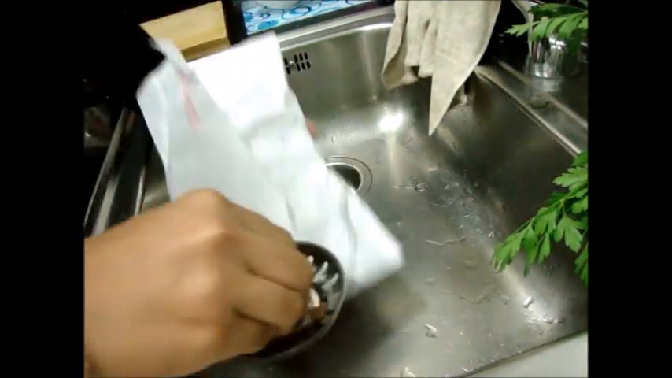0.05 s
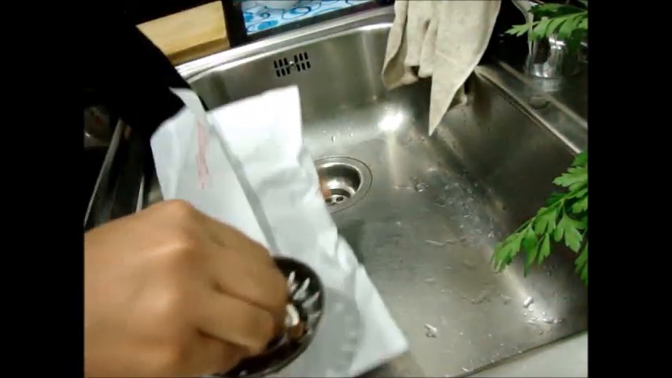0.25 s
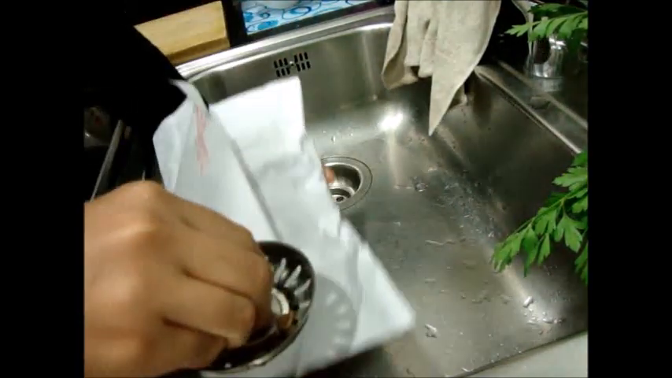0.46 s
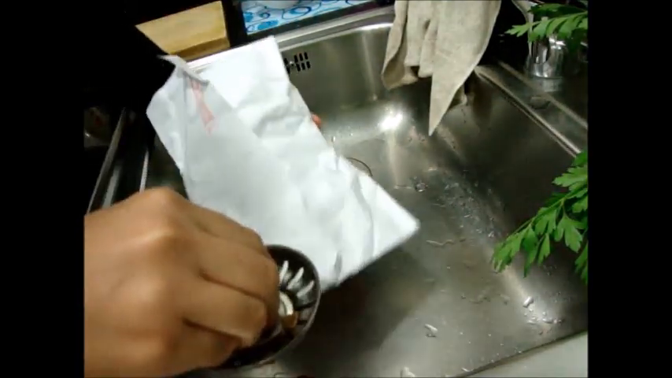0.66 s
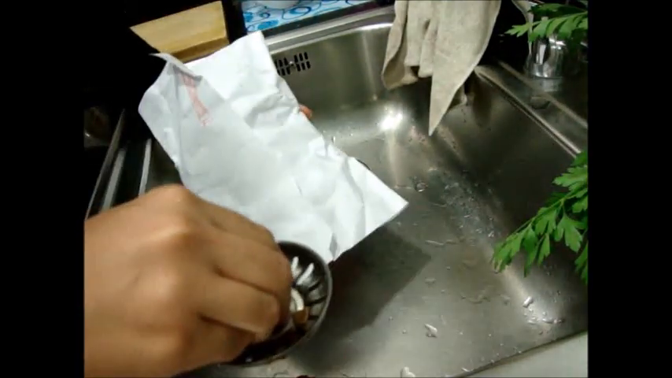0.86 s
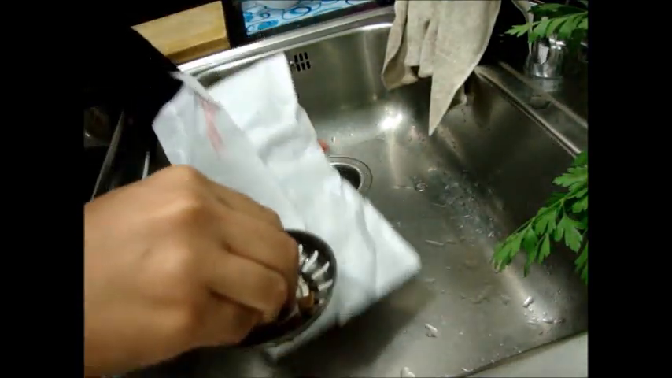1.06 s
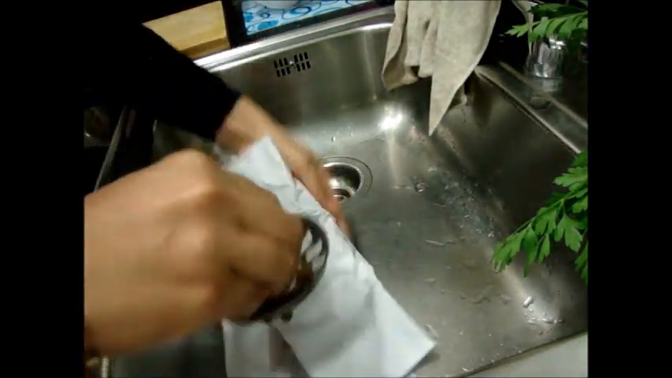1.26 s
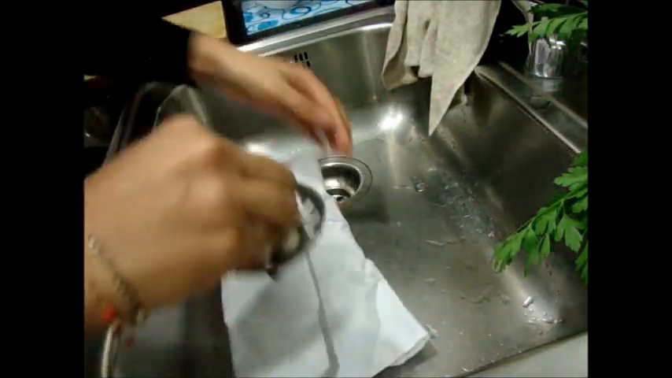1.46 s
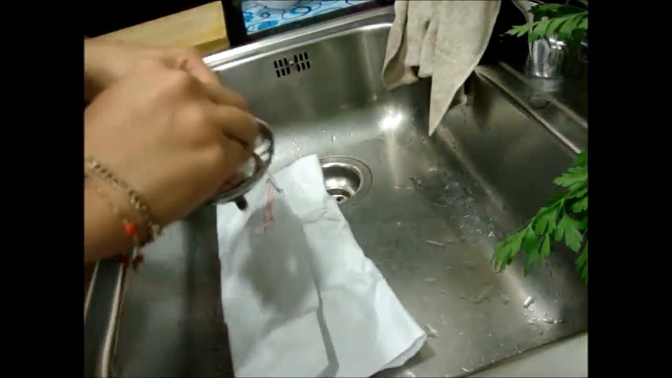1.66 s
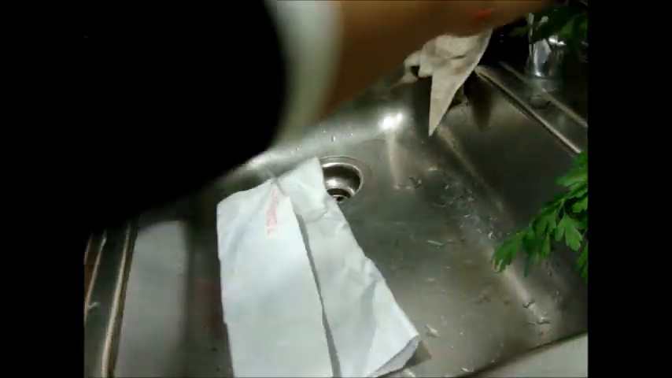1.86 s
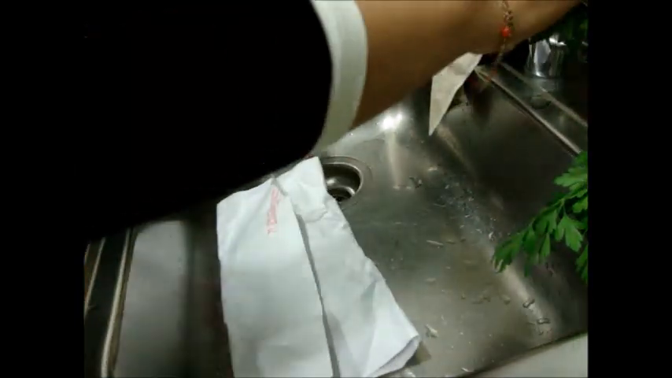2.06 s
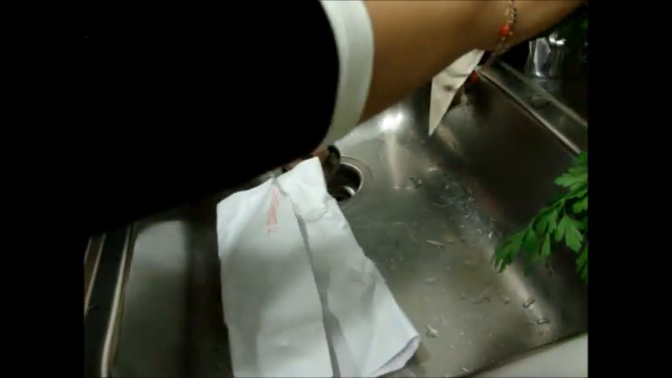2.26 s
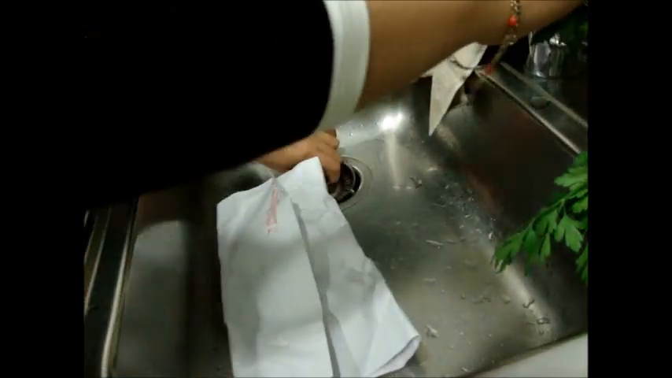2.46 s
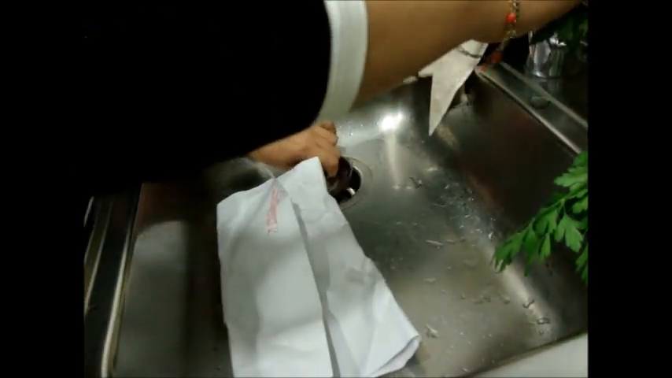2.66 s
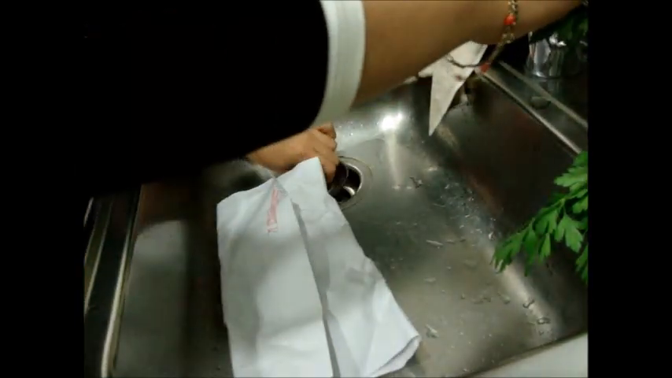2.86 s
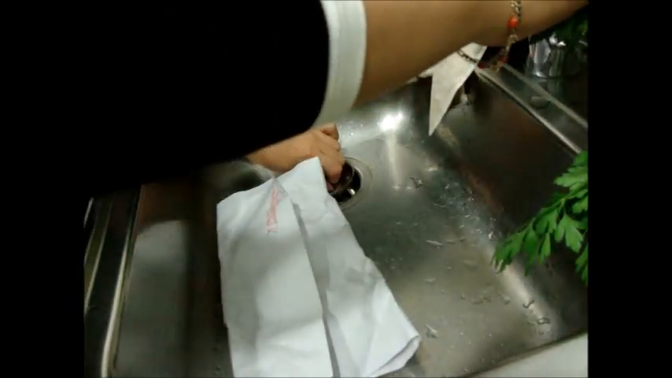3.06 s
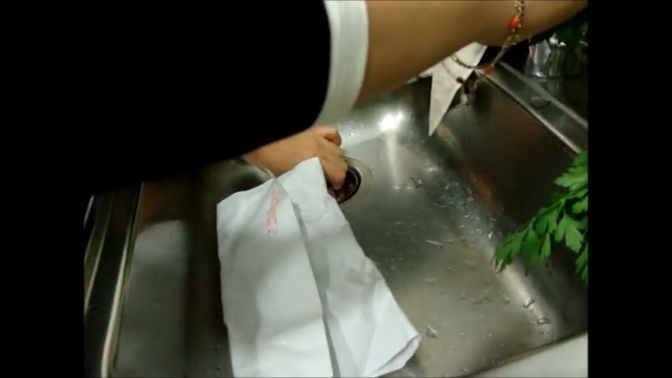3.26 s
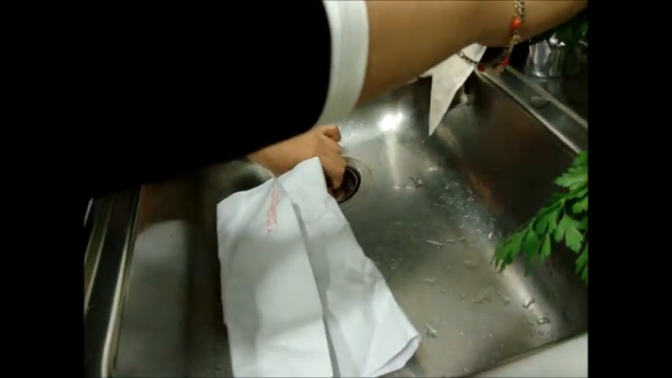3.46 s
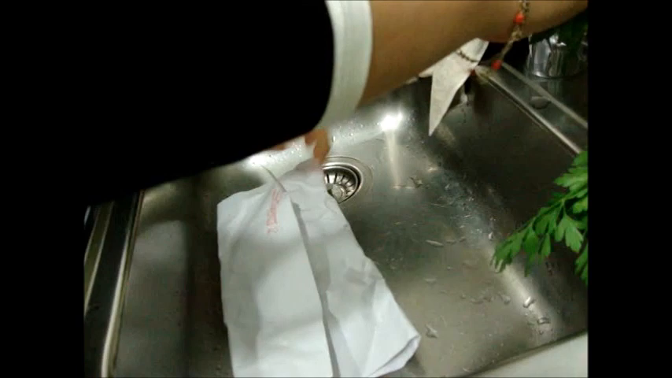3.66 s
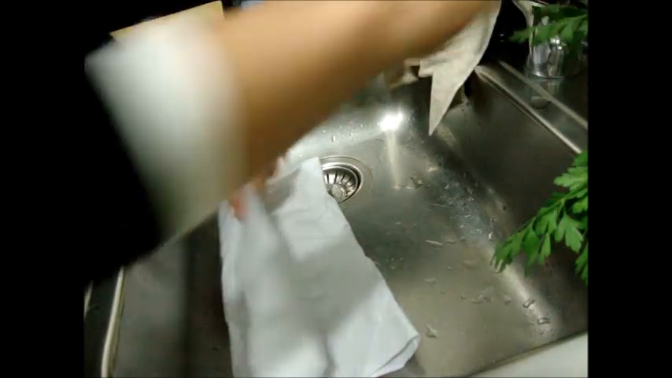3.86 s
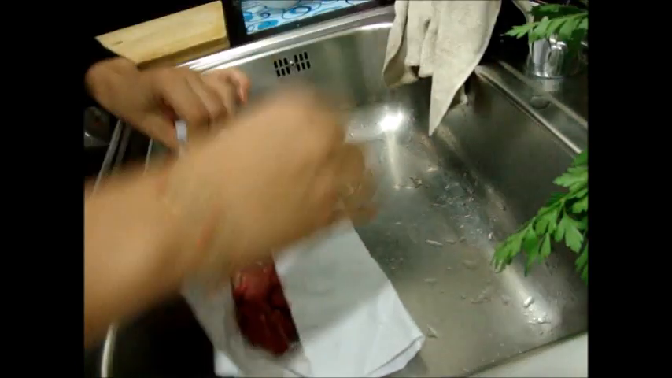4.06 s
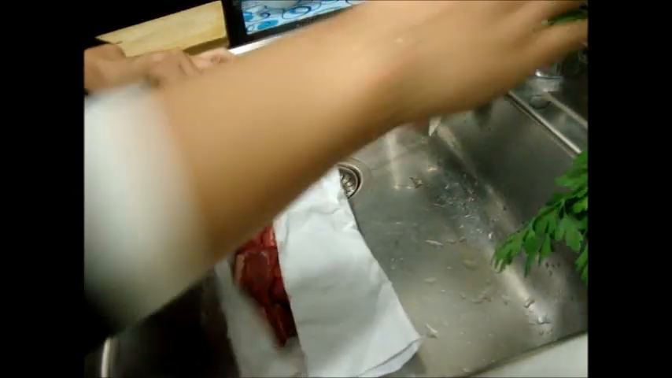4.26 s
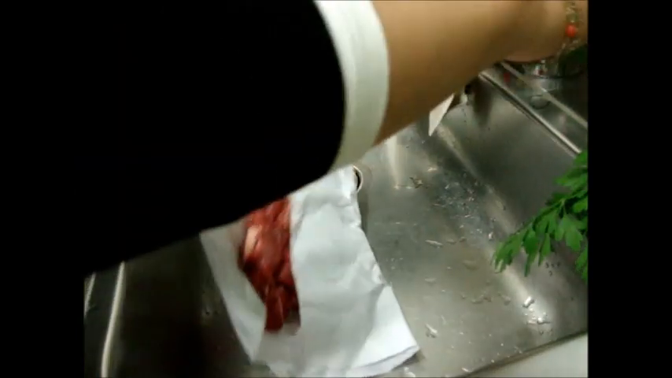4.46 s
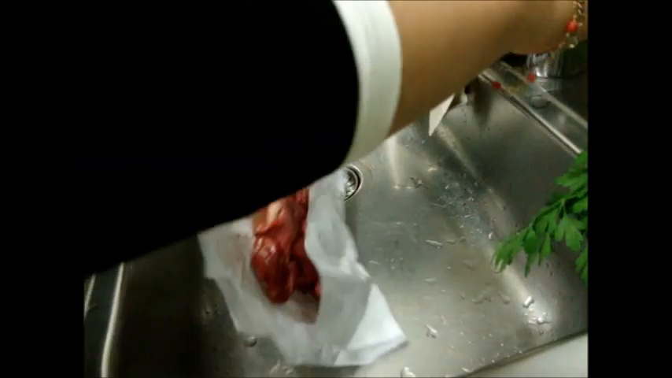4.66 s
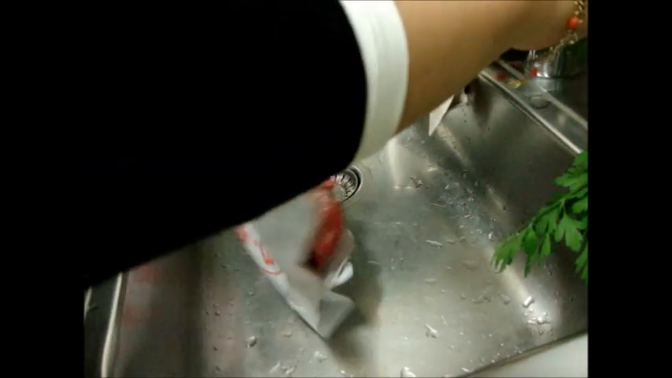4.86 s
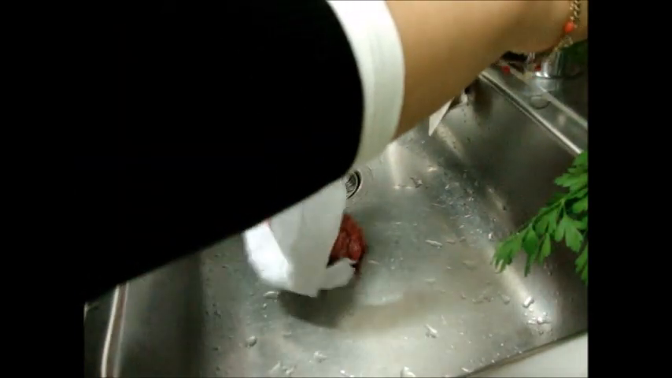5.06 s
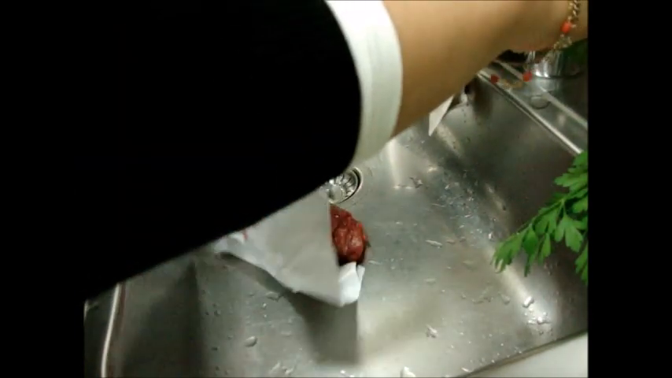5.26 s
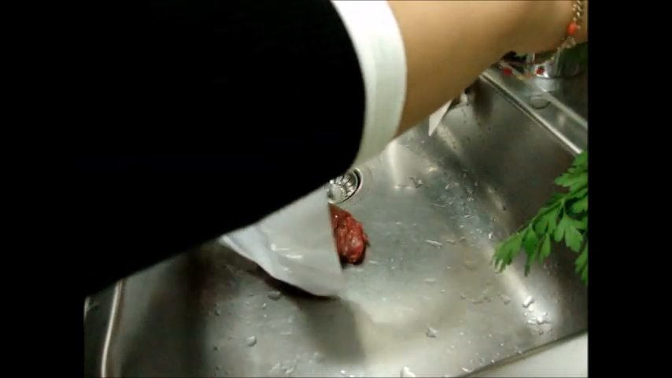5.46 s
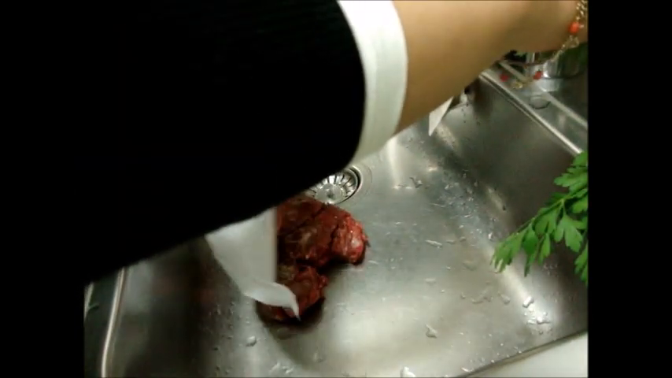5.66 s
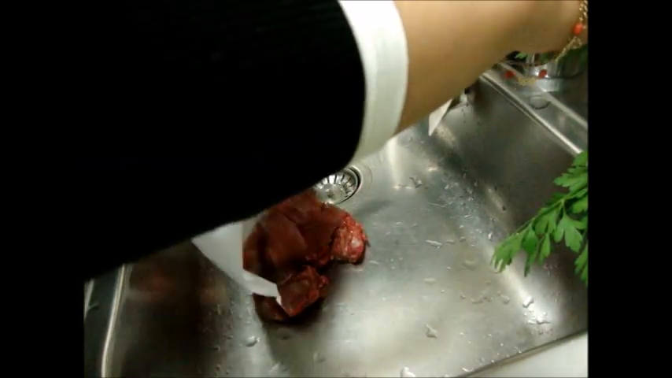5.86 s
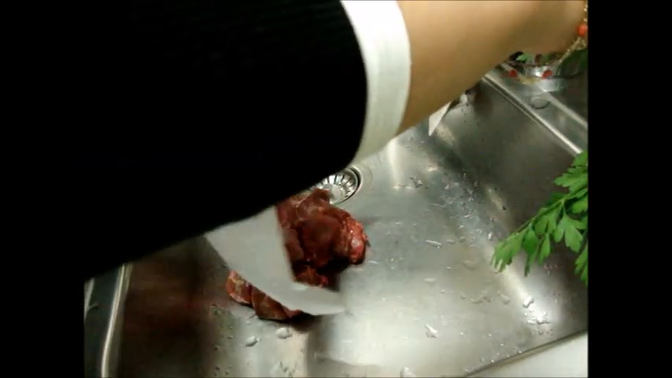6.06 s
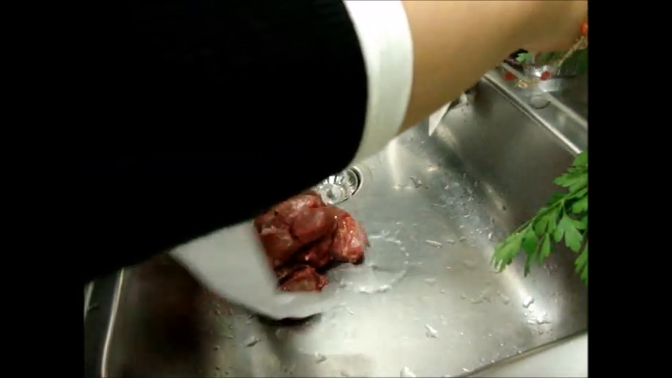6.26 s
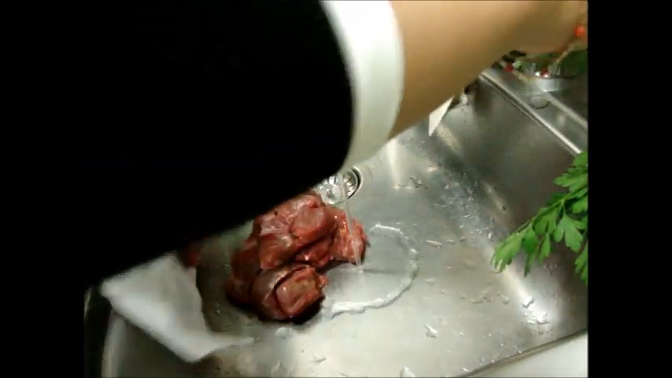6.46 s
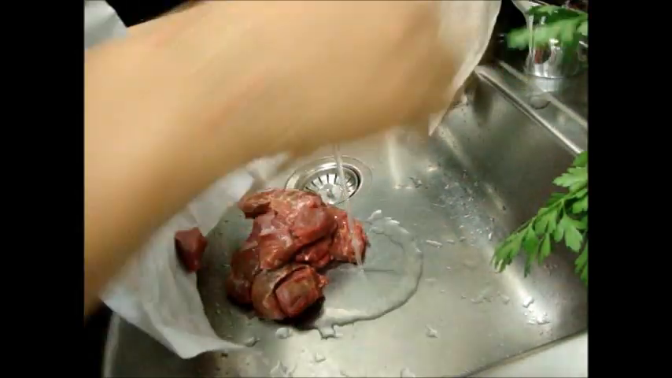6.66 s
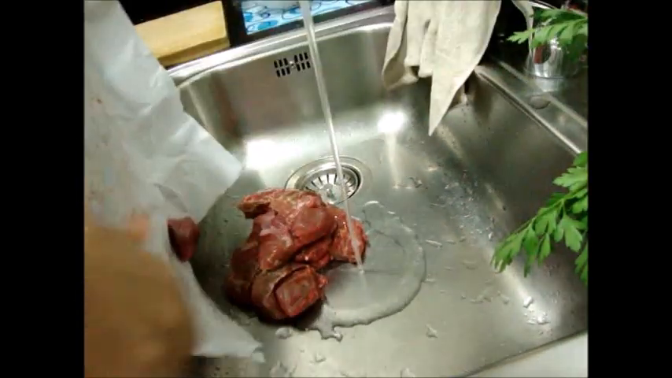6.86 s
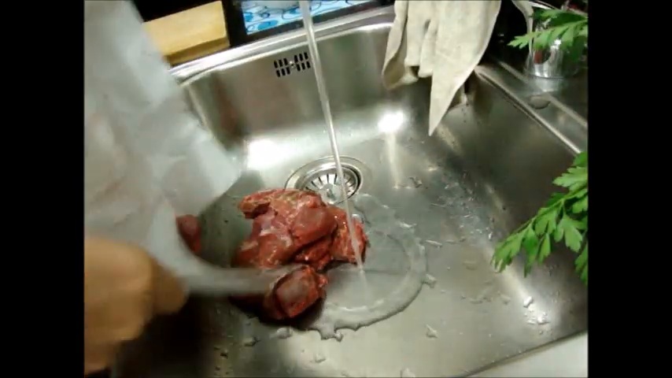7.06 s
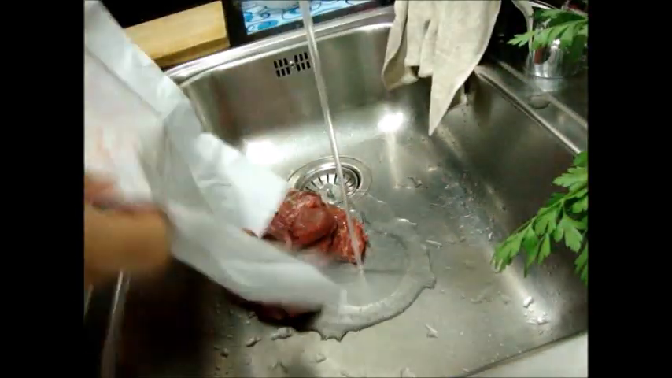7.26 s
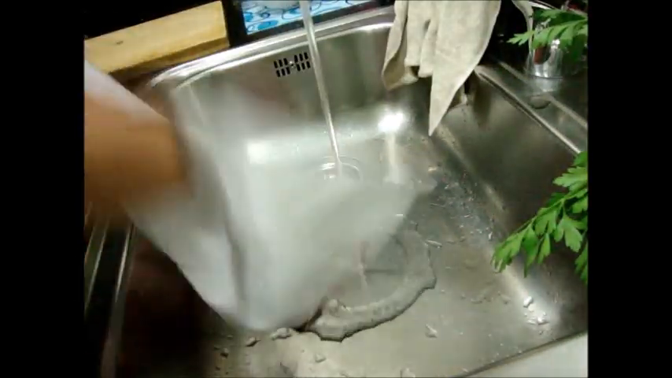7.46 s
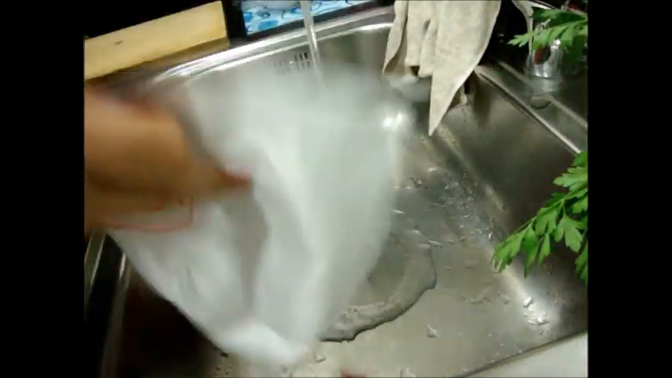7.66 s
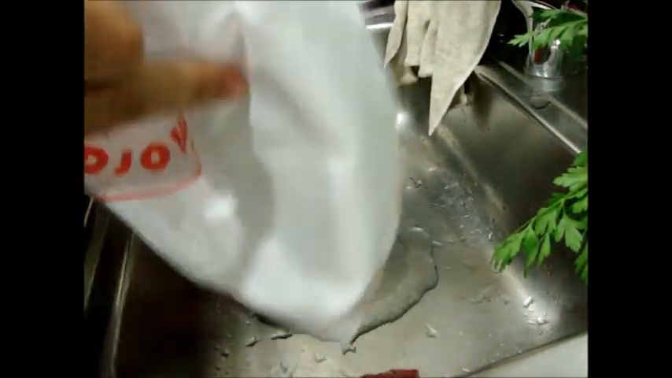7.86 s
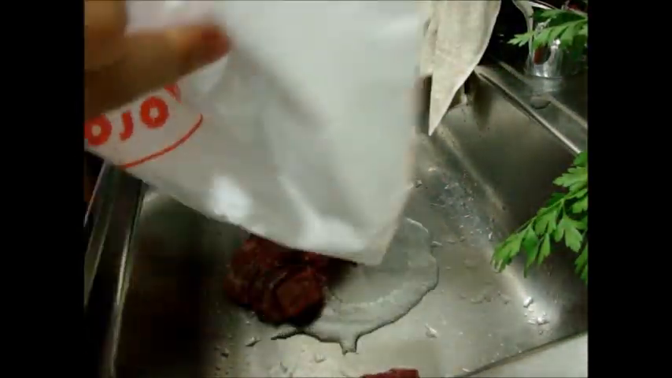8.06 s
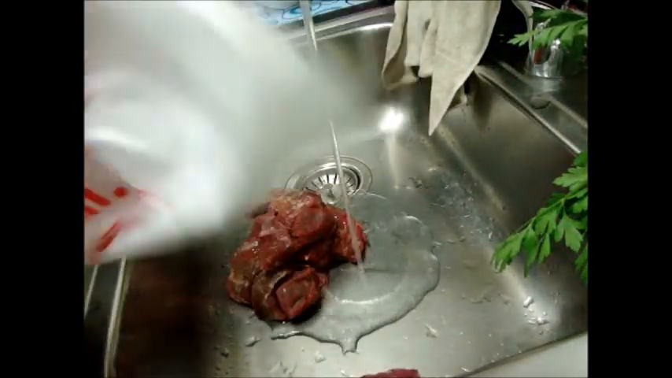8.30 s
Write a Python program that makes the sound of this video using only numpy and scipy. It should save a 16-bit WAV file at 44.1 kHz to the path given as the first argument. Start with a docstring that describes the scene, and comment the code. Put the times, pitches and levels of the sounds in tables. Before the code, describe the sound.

Paper rustles and snaps, a metal strainer clanks into a steel sink, meat thuds down, and a thin stream of tap water spatters.

```python
"""At a steel kitchen sink. First, wrapping paper is shaken and laid down, rustling and snapping.
From about 2 s a strainer is knocked into the drain, and both it and the basin ring.
Around 5 s meat tumbles out of the crunching paper and thuds on the steel. Near 6 s the tap opens,
and a thin stream hisses, spatters and drums on the basin while the paper crackles on."""
import sys
import numpy as np
from scipy import signal
from scipy.io import wavfile
from scipy.ndimage import uniform_filter1d

SR = 44100
rng = np.random.default_rng(int(sys.argv[2]) if len(sys.argv) > 2 else 0)


def store_wav(level_fs):
    """Save 16-bit WAV to argv[1]."""
    pcm = np.round(np.clip(np.atleast_2d(level_fs), -1, 1) * 32767)
    wavfile.write(sys.argv[1], SR, pcm.T.astype(np.int16))


N = 367353

# The notes the steel basin rings with, lowest first.
# Each row: pitch in Hz, relative level in dB, seconds to fade by 60 dB before damping.
BASIN_NOTES = [(115, -13.5, 0.26), (153.6, -4, 0.29), (234.3, -4, 0.18), (300.6, -10, 0.54),
               (418.6, 12.5, 0.36), (476, -0.5, 0.3), (507, -7, 0.3), (559, 0, 0.4), (652, -2, 0.23),
               (716, 8.5, 0.11), (802, -14, 0.94), (858, 9, 0.21), (936, -8.5, 0.2), (998, 3.5, 0.39),
               (1190, -2, 0.25), (1350, -21, .16)]


def gain_of(db):
    """Turns decibels into a number to multiply by."""
    return 10 ** (np.asarray(db) / 20)


def evened(x):
    """Scales a sound to an average strength (rms) of 1."""
    return x / np.sqrt(np.mean(x ** 2) + 1e-20)


def follow(rows):
    """Joins rows of a time and levels in dB into one gain curve per level, silent outside them."""
    times, *levels = np.transpose(rows)
    return [gain_of(np.interp(np.arange(N) / SR, times, db, -120, -120)) for db in levels]


def add(mix, start, sound):
    """Mixes a sound in at a start time in seconds."""
    part = mix[round(start * SR):][:len(sound)]
    part += sound[:len(part)]


def band(x, lo_hz, hi_hz):
    """Keeps the part of a sound between two pitches, at strength 1."""
    return evened(signal.sosfilt(signal.butter(3, [lo_hz, hi_hz], "bandpass", fs=SR, output="sos"), x))


def wobble(seconds):
    """A random curve that changes over about this much time."""
    return evened(uniform_filter1d(rng.standard_normal(N), int(seconds * SR)))


def hiss(spectrum, patchy_db, size=512):
    """Noise with a given balance of low and high, and drifting louder and softer patches."""
    frames, hz = 4 * N // size + 5, np.fft.rfftfreq(size, 1 / SR)
    real, imag, patches = rng.standard_normal((frames, len(hz), 3)).T
    patches = evened(uniform_filter1d(uniform_filter1d(patches, size=5, axis=0), size=6, axis=1))
    points_hz, points_db = np.transpose(spectrum)
    db = np.interp(np.log(hz + 1), np.log(points_hz + 1), points_db)
    shaped = (real + 1j * imag) * gain_of(db[:, None] + patchy_db * patches)
    return evened(signal.istft(shaped, nperseg=size, noverlap=3 * size // 4)[1][:N])


def clicks(per_s, spread_db):
    """Clicks of uneven size at random moments."""
    return gain_of(spread_db * np.minimum(rng.exponential(1, N), 4)) * (rng.random(N) < per_s / SR)


def crackle(per_s, spread_db, grain_s):
    """Noise chopped into many short grains."""
    decay = np.exp(-1 / (grain_s * SR))
    return evened(signal.lfilter([1], [1, -decay], clicks(per_s, spread_db)) * rng.standard_normal(N))


def resonate(x, hz, width_hz):
    """Narrows noise to a breathy note whose pitch may move."""
    turn = np.exp(2j * np.pi * np.cumsum(hz * np.ones(len(x))) / SR)
    return evened((turn * signal.lfilter([1], [1, -np.exp(-np.pi * width_hz / SR)], x / turn)).real)


def ring(notes, centre_hz, damping, reach_db, rise_s=0.00012):
    """One blow on pressed steel, which splits each note into two close pitches that waver together."""
    hz, db, fade_s = np.transpose(notes)[:, :, None]
    t = np.arange(SR // 2) / SR
    # Where the blow lands favours notes near centre_hz; the rest lose at most reach_db.
    db = db - np.minimum(16 * np.log2(hz / centre_hz) ** 2, reach_db)
    split, phase, twin_phase = rng.random((len(hz), 3, 1)).transpose(1, 0, 2)
    tone = np.sin(2 * np.pi * (hz * t + phase))
    twin = np.sin(2 * np.pi * (hz * (1.003 + 0.008 * split) * t + twin_phase))
    sound = (gain_of(db - 60 * t * damping / fade_s) * (tone + 0.4 * twin)).sum(0)
    return sound * (1 - np.exp(-t / rise_s)) / np.linalg.norm(gain_of(db))


def rattled(sound, fade_s, bounce_db):
    """A quick run of small bounces after a blow roughens its ring."""
    t = np.arange(int(.08 * SR)) / SR
    bounces = rng.standard_normal(len(t)) * (rng.random(len(t)) < 900 / SR)
    bounces *= gain_of(bounce_db - 60 * t / fade_s)
    bounces[0] = 1
    return signal.fftconvolve(sound, bounces / np.linalg.norm(bounces))


def burst(level_db, hz, body_db, edge_db, fade_s, crack_s, tail_db):
    """A short crack around a hollow pitch, then echoes in the basin that last longer in the bass."""
    t = np.arange(int(.3 * SR)) / SR
    noise, out = rng.standard_normal(len(t)), np.zeros(len(t))
    layers = [(body_db, 230, 750, 1.3, .0025), (level_db, 0.65 * hz, 1.42 * hz, 1.1, .0005),
              (level_db - 4, 900, 3500, .9, .0005),
              (edge_db, 3500, 7000, .8, .0004), (edge_db - 7.5, 6500, 10000, .75, .0003)]
    for db, lo_hz, hi_hz, stretch, rise_s in layers:
        fade = np.exp(-t / crack_s) + gain_of(tail_db - 60 * t / (stretch * fade_s))
        out += gain_of(db) * band(noise, lo_hz, hi_hz) * (1 - np.exp(-t / rise_s)) * fade
    return out


def kitchen_air():
    """The quiet, steady hiss of the room."""
    # The tone of the room. Each row: frequency in Hz, relative level in dB.
    spectrum = [(18, -12), (30, -33.5), (149, -6), (358, -11), (414, -4.5), (456, -7.5), (880, -7),
                (1180, -10.5), (4710, -16), (10000, -21.5), (13000, -71), (22000, -120)]
    return gain_of(-53.5) * hiss(spectrum, patchy_db=1.8, size=1024)


def puffs():
    """Air moved by the flapping paper pushes on the microphone."""
    # Puffs of air. Each row: start in seconds, level in dB.
    gusts = [(0.17, -49), (0.399, -56), (1.288, -36), (2.869, -76), (5.049, -37), (5.899, -56),
             (6.749, -45), (7.519, -44)]
    out, progress = np.zeros(N), np.linspace(0, 1, int(0.032 * SR))
    for start, db in gusts:
        add(out, start, gain_of(db) * np.sin(2 * np.pi * 2.6 * progress) * np.sin(np.pi * progress) ** 2)
    return out


def thuds():
    """Soft blows wake only the basin's low notes, damped by what lies on the steel."""
    # Hands, meat and surges of water. Each row: start in seconds, level in dB, favoured pitch in Hz.
    blows = [(0.163, -28, 310), (1.292, -25.5, 158), (1.338, -28, 306), (2.439, -17.5, 197),
             (2.867, -42, 153), (3.186, -24.5, 182), (5.045, -19.5, 113.2), (5.072, -15.5, 232),
             (6.196, -21, 204), (6.28, -33, 300), (6.34, -23, 225), (6.642, -28.5, 288)]
    out = np.zeros(N)
    for start, db, hz in blows:
        add(out, start, gain_of(db) * ring(BASIN_NOTES[:4], hz, damping=2.2, reach_db=11, rise_s=0.0042))
    return out


def flap():
    """A fold of paper swings down, and its hollow note falls as it opens."""
    # The swing. Each row: time in seconds, level in dB, pitch in Hz.
    swing = [(0.1, -44, 1990), (0.13, -51, 1470), (0.15, -44, 1020), (0.171, -30.5, 740), (0.195, -42, 664),
             (0.21, -62, 660)]
    times, _, hz = np.transpose(swing)
    pitch = np.interp(np.arange(N) / SR, times, hz)
    loudness, = follow([row[:2] for row in swing])
    return loudness * resonate(rng.standard_normal(N), pitch, width_hz=76)


def pops():
    """A crease flips or the strainer strikes: a tone a few waves long, with a fainter, higher one."""
    # Hard pops. Each row: start in seconds, level in dB, pitch in Hz.
    hits = [(1.215, -18.5, 890), (1.283, -17, 1440), (1.447, -25, 665), (2.165, -23, 1050),
            (2.429, -9, 2500), (2.427, -11.5, 1250), (2.475, -25, 1790), (2.701, -24, 1910),
            (2.863, -9.5, 860), (3.27, -26.5, 510), (3.881, -18, 1160), (4.846, -20, 1480),
            (4.904, -25, 1050), (4.927, -27.5, 480), (4.964, -23, 1090), (4.995, -10.5, 1310),
            (5.054, -17, 1200), (5.125, -8.5, 1640), (5.229, -20.5, 564), (5.327, -25, 523),
            (5.433, -22.5, 2700), (6.951, -25.5, 530), (7.013, -20.5, 890), (7.044, -24, 860),
            (7.279, -19.5, 593), (7.495, -49, 585), (7.668, -22, 950)]
    out = np.zeros(N)
    for start, db, hz in hits:
        phase, high_phase = rng.random(2)
        cycles = np.arange(SR // 100) / SR * hz
        tone = np.sin(2 * np.pi * (cycles + phase))
        tone += gain_of(-19.5) * np.sin(2 * np.pi * (2.53 * cycles + high_phase))
        age = cycles / 1.08  # loudest at age 1
        add(out, start, gain_of(db) * tone * (age * np.exp(1 - age)) ** 2)
    return out


def tap():
    """Air and water rush through the spout and hiss at the valve as the tap opens."""
    # The tap opening. Each row: time in seconds, spout level in dB, valve level in dB.
    opening = [(5.82, -83, -76), (5.9, -51, -61), (5.964, -46, -60), (6.076, -61, -54), (6.176, -59, -56),
               (6.3, -75, -55), (6.6, -75, -47.5)]
    # The notes of the spout and of the valve. Each row: pitch in Hz, width in Hz, relative level in dB.
    spout = [(660, 60, -6), (940, 69, -5)]
    valve = [(3400, 230, -1), (4090, 120, -7), (5550, 300, -9.5)]
    noise, out = rng.standard_normal(N), np.zeros(N)
    for loudness, notes in zip(follow(opening), (spout, valve)):
        out += loudness * evened(sum(gain_of(db) * resonate(noise, hz, width) for hz, width, db in notes))
    return out


def spatters(pitches=14, cycles=9.3):
    """Separate drops, each a tiny note that rises as its bubble closes."""
    sizes = clicks(per_s=100, spread_db=2.7)
    kind, out = rng.integers(0, pitches, N), np.zeros(N)
    for k, hz in enumerate(np.geomspace(4390, 7800, pitches)):
        age = np.arange(SR // 100) / SR * hz / cycles
        drop = np.sin(2 * np.pi * cycles * age * (0.952 + 0.041 * age)) * age * np.exp(-2.5 * age)
        out += signal.oaconvolve(sizes * (kind == k), drop)[:N]
    return evened(out)


def water():
    """The stream splats on dry steel, then hisses, drums on the basin and spatters in spurts."""
    # The stream on the steel. Each row: time in seconds, then hiss, drumming and spatter levels in dB.
    stream = [(6.195, -51, -45, -62), (6.26, -47, -42.5, -51), (6.37, -41.5, -41.5, -51),
              (6.5, -42, -43, -65), (6.63, -46.5, -46, -40), (6.75, -43.5, -37, -49),
              (6.88, -38.5, -42.5, -40), (7.04, -39.5, -48, -54), (7.24, -46.5, -47.5, -49),
              (7.5, -40.5, -44.5, -47), (7.77, -39, -45, -43.5), (7.92, -39, -41, -47),
              (8.1, -40, -45, -45.5), (8.33, -37, -45, -44.5)]
    # The tone of the spray. Each row: frequency in Hz, relative level in dB.
    spectrum = [(290, -30), (500, -1.5), (619, 6.5), (827, -12), (1050, 3.5), (1800, -6), (2320, 0),
                (3020, -5), (4080, 0), (6000, -13.5), (8050, -8), (9600, -5), (10100, -8), (13100, -66),
                (22000, -120)]
    hiss_gain, drum_gain, spatter_gain = follow(stream)
    spurts = gain_of(4.5 * wobble(0.051))
    drops = crackle(per_s=420, spread_db=4, grain_s=.0018)
    sputter = 0.6 * band(drops, 4470, 6800) + spatters() + 0.078 * band(drops, 630, 5400)
    beats = crackle(per_s=600, spread_db=2.5, grain_s=.002)
    low_ring = ring(BASIN_NOTES[:4], centre_hz=152, damping=2.7, reach_db=2)
    drum = 0.98 * evened(signal.oaconvolve(beats, low_ring)[:N])
    drum += 0.42 * band(beats, 170, 328) + 0.37 * band(beats, 38, 100) + 0.36 * band(beats, 460, 930)
    spray = gain_of(1.5 * wobble(0.018)) * hiss(spectrum, patchy_db=4)  # flickers quickly in loudness
    mist = gain_of(-15.5) * band(crackle(per_s=1200, spread_db=2, grain_s=.003), 9200, 10640)
    droplets = gain_of(-5.5) * band(crackle(per_s=71, spread_db=3.5, grain_s=.0038), 4730, 6150)
    out = hiss_gain * (spray + mist) + drum_gain * drum + spatter_gain * spurts * (sputter + droplets)
    splat = burst(-30.5, hz=734, body_db=-30.5, edge_db=-50.5, fade_s=0.81, crack_s=0.0059, tail_db=-6.5)
    add(out, stream[0][0], splat)
    return out


def spray_ticks():
    """Short bright ticks in the spray, each a ping with a faint splashy tail."""
    # The ticks. Each row: start in seconds, level in dB, pitch in Hz.
    ticks = [(6.349, -30, 6000), (6.374, -28, 7500), (6.553, -21.5, 4400), (6.647, -29.5, 5100),
             (6.6732, -26, 5530), (6.7098, -18.5, 7640), (6.728, -24, 4600), (6.7428, -5, 4110),
             (6.775, -15.5, 4980), (6.8106, -32, 4850), (6.847, -18, 6060), (6.8726, -24, 5460),
             (7.218, -8, 5930), (7.261, -18.5, 5460), (7.29, -13.5, 6000), (7.3527, -17, 6100),
             (7.426, -12, 5900), (7.446, -20, 5910), (7.5203, -21, 5470), (7.5437, -13.5, 4040),
             (7.583, -17.5, 5800), (7.6542, -8, 6300), (7.7144, -23, 6350), (7.7413, -23, 5500),
             (7.8401, -23, 4470), (7.894, -18, 5440), (7.989, -17.5, 3750), (8.0003, -16, 5370),
             (8.0344, -18, 4050), (8.082, -43, 5730), (8.094, -15.5, 5430), (8.121, -14.5, 5720),
             (8.275, -26, 4260), (8.2973, -24, 7220)]
    t, out = np.arange(SR // 15) / SR, np.zeros(N)
    for start, db, hz in ticks:
        tone = np.sin(2 * np.pi * hz * (t + 0.00027 * np.tanh((t / 0.017) ** 2)))
        splash = band(rng.standard_normal(len(t)), 0.82 * hz, 1.26 * hz)
        tail = gain_of(-29.5 - 15.5 * np.log2(hz / 5500)) * np.exp(-t / 0.034)  # lower ticks ring more
        sound = (tone + 0.41 * splash) * np.exp(-t / 0.0012) + splash * tail
        add(out, start, gain_of(db) * sound * (1 - np.exp(-t / 0.00039)))
    return out


def strainer():
    """Each knock cracks, rattles and rings both strainer and basin; sliding rubs the strainer's notes."""
    # The strainer's own notes, with the same columns as BASIN_NOTES.
    notes = [(1200, -3, .13), (1520, -7, .08), (1680, -3, .12), (1850, -3, .12), (2260, -6, .1),
             (2600, -3, .16), (2850, -4, .14), (3300, -8, .07), (3800, -6, .07), (4100, -5, .06),
             (4600, -7, .06), (5050, -4, .08), (5500, -7, .06), (5900, -5, .07), (6350, -7, .06),
             (7800, -11, .05), (8300, -11, .05)]
    # Knocks on the drain or fingers. Each row: start in seconds, crack, basin and strainer levels in dB,
    # favoured pitch in Hz, bright edge in dB, how strongly the hand damps the basin.
    knocks = [(0.39, -51, -40.5, -47, 4020, -53, 2.3), (0.548, -43, -46, -35, 6600, -52, 1.3),
              (0.576, -32, -43, -60, 3850, -54, 2.1), (0.609, -36, -43.5, -42.5, 3800, -55, 1.16),
              (0.894, -32, -44, -41.5, 8300, -46, 2), (0.978, -25, -42, -33, 1680, -43.5, 1.8),
              (1.022, -36, -37.5, -33.5, 1610, -54, 2.5), (1.678, -39, -67, -44.5, 1600, -65, 1.5),
              (2.164, -17.5, -28, -27, 2640, -24.5, 2.1), (2.429, -3.5, -20.5, -15.5, 1920, -25, 2.6),
              (2.432, -30, -42, -26, 8000, -31, 3.3), (2.474, -7.5, -27.5, -18.5, 1780, -31, 1.6),
              (2.559, -43, -32.5, -56, 2410, -49, 3.1), (2.697, -22, -29.5, -26.5, 1910, -36, 2.9),
              (2.862, -3, -4, -9, 5570, -18, 1.1), (2.961, -16, -18.5, -24.5, 2180, -45, 1.46),
              (3.053, -44, -29, -37, 2270, -59, 0.92), (3.19, -25, -34.5, -35, 1710, -45, 1.14),
              (3.27, -20.5, -25, -35, 1805, -58, 1.7)]
    # Slides on the steel. Each row: start and length in seconds, top level in dB, favoured pitch in Hz.
    scrapes = [(2.616, 0.12, -29.5, 1630), (3, 0.25, -44, 1950), (3.611, 0.053, -28.5, 3600)]
    t, out = np.arange(SR // 2) / SR, np.zeros(N)
    for start, crack_db, basin_db, cup_db, hz, edge_db, held in knocks:
        basin = gain_of(basin_db) * ring(BASIN_NOTES, 635, damping=held, reach_db=-1.5, rise_s=0.0027)
        cup = gain_of(cup_db) * ring(notes, hz, damping=1.6, reach_db=22)
        add(out, start, rattled(basin, fade_s=0.1, bounce_db=-24))
        add(out, start, rattled(cup, fade_s=0.12, bounce_db=-10))
        # Slots and loose parts blur into a jangle, the basin's many close notes into a clank.
        jangle = band(rng.standard_normal(len(t)), 0.74 * hz, min(1.036 * hz, 10000))
        add(out, start, gain_of(cup_db - 13 - 60 * t / 0.25) * jangle)
        clank = band(rng.standard_normal(len(t)), 510, 1064) * (1 - np.exp(-t / 0.0044))
        add(out, start, gain_of(basin_db - 11 - 60 * t * held / 0.41) * clank)
        add(out, start, burst(crack_db - 14, min(hz, 2500), basin_db - 4, edge_db,
                              fade_s=0.57, crack_s=0.0045, tail_db=-22))
    grit = crackle(per_s=1500, spread_db=1.5, grain_s=.002)
    for start, length, db, hz in scrapes:
        fastest = start + 0.45 * length
        loudness, = follow([(start, db - 18), (fastest, db), (start + length, db - 18)])
        rubbed = signal.oaconvolve(grit, ring(notes, hz, damping=3.1, reach_db=12))[:N]
        out += loudness * (0.34 * evened(rubbed) + 0.51 * band(grit, 330, 7000))
    return out


def paper():
    """Paper rustles under the hands, rumbles on the basin, snaps, and crunches as folds are crushed."""
    # One list per handling. Each row: time in seconds, rustle level in dB, higher crinkle level in dB.
    handlings = [
        [(0.0, -53, -49.5), (0.074, -49.5, -48.5), (0.178, -47, -71), (0.278, -59, -68), (0.508, -62, -62),
         (0.7, -59.5, -65)],
        [(0.86, -68, -78), (0.948, -54.5, -81), (1.068, -60.5, -57), (1.2, -46.5, -48), (1.235, -30.5, -38),
         (1.358, -32.5, -35.5), (1.5, -51.5, -44.5), (1.62, -72, -103)],
        [(3.79, -60, -63), (3.84, -40.5, -51), (3.9, -45, -62), (3.97, -45, -61), (4.04, -50, -61)],
        [(4.3, -79, -70), (4.502, -56.5, -50.5), (4.726, -48.5, -44.5), (4.95, -43, -45.5), (5.078, -34, -64),
         (5.22, -35.5, -53), (5.29, -50, -48), (5.388, -48, -52.5), (5.516, -41.5, -50.5), (5.62, -61, -65)],
        [(5.8, -78, -68), (5.92, -59, -52.5), (6.074, -68, -61), (6.2, -72, -51)],
    ]
    # Paper snaps and taps of the hands.
    # Each row: start in seconds, level in dB, hollow pitch in Hz, low body in dB, bright edge in dB.
    snaps = [(0.201, -25.5, 1010, -26, -36.5), (0.281, -34.5, 1110, -34, -58),
             (1.214, -41, 920, -19.5, -37), (3.794, -27.5, 2140, -25.5, -33.5),
             (3.801, -35, 1890, -30, -27.5), (3.832, -20.5, 1040, -29, -30.5),
             (3.882, -15, 990, -15.5, -29.5), (3.894, -25.5, 1470, -45, -29.5),
             (3.924, -26.5, 1170, -45, -41), (3.959, -27.5, 1380, -26, -36), (4.078, -45, 1440, -62, -35),
             (4.185, -27, 1400, -31.5, -33), (4.682, -23, 1070, -32.5, -43), (4.8, -33, 1140, -53, -33),
             (4.847, -28, 1370, -34, -30.5), (4.904, -21.5, 970, -19, -32), (4.928, -28, 1560, -47, -30.5),
             (4.963, -19, 1120, -47, -54), (4.995, -22.5, 1350, -20, -27), (5.111, -13.5, 665, -38, -16.5),
             (5.125, -14, 2020, -20.5, -43), (5.358, -24.5, 1170, -31, -31.5), (5.396, -26, 820, -45, -46),
             (5.433, -31, 1310, -32, -31.5), (5.474, -18.5, 1470, -19.5, -19),
             (5.536, -26, 836, -32, -29.5), (5.659, -34.5, 1110, -54, -54), (5.708, -22, 1260, -34, -43),
             (6.646, -26, 760, -34, -18.5), (6.744, -27, 684, -28, -18), (6.893, -26, 940, -17, -37),
             (7.044, -21.5, 860, -45, -33), (7.066, -31, 810, -53, -49), (7.28, -20.5, 2030, -21.5, -26),
             (7.296, -22.5, 650, -33, -21), (7.527, -18.5, 925, -23.5, -39), (7.541, -22.5, 805, -36, -24),
             (7.672, -28, 925, -19.5, -23.5), (7.888, -26, 655, -34, -47), (7.95, -21.5, 880, -23.5, -30),
             (8.274, -19.5, 795, -18, -30), (8.044, -24, 1250, -39, -47), (8.303, -25.5, 1280, -31, -48)]
    # Crushed folds, too many cracks to tell apart, with the same columns as the snaps.
    crunches = [(0.122, -24.5, 1620, -30, -59), (1.262, -13.5, 880, -15.5, -17.5),
                (1.283, -23, 1480, -17, -20.5), (1.333, -19.5, 830, -37, -25),
                (1.425, -17.5, 890, -28, -18.5), (1.446, -21.5, 780, -35, -28),
                (5.05, -16, 1110, -16.5, -14.5), (5.188, -28, 2070, -30, -21.5),
                (5.228, -21, 1260, -25, -56), (5.328, -30, 1030, -26, -56), (6.951, -21, 910, -23, -22),
                (7.014, -22.5, 1050, -21, -28.5), (7.496, -22, 630, -47, -26),
                (7.624, -23.5, 640, -42, -29), (7.661, -12, 880, -18.5, -21),
                (8.016, -23.5, 1050, -47, -49), (8.184, -21, 790, -50, -41)]
    t, out = np.arange(N) / SR, np.zeros(N)
    grains = crackle(per_s=900, spread_db=2.5, grain_s=.003)
    sliding = crackle(per_s=1600, spread_db=2, grain_s=.003)
    rustle = band(grains, 750, 2460)
    crinkle = band(sliding, 2480, 5900) + 0.5 * band(grains, 4650, 6800)
    crinkle += 0.41 * band(sliding, 7650, 8900)
    rumble = gain_of(-3.5) * (band(grains, 264, 590) + .5 * band(grains, 170, 354))
    for rows in handlings:
        rustle_gain, crinkle_gain = follow(rows)
        out += rustle_gain * (rustle + rumble) + crinkle_gain * crinkle
    for start, *tone in snaps:
        add(out, start, burst(*tone, fade_s=0.15, crack_s=0.0017, tail_db=-12))
    for start, *tone in crunches:
        crunch = burst(*tone, fade_s=0.18, crack_s=0.0061, tail_db=-8.5)
        add(out, start, crunch * (1 - np.exp(-t[:len(crunch)] / 0.012)))
    return out


def scene():
    """All the sounds over the quiet kitchen air; the sounds at the sink carry little deep bass below about 100
    Hz, while the puffs of air keep theirs."""
    air = kitchen_air()
    sink = paper() + flap() + strainer() + thuds() + pops() + tap() + water() + spray_ticks()
    sink = signal.sosfilt(signal.butter(3, 105, "highpass", fs=SR, output="sos"), sink)
    return (air + sink + puffs())[None]


def record(dry):
    """Gently squashes the loudest peaks, then cuts off the treble above about 10 kHz."""
    sound = dry / (1 + (dry / .92) ** 4) ** .25
    for length, top_hz, beta in [(401, 10040, 6.5), (511, 11289, 9)]:
        lowpass = signal.firwin(length, top_hz, window=("kaiser", beta), fs=SR)
        sound = signal.oaconvolve(sound, lowpass[None], "same")
    return sound


dry = scene()
out = record(dry)
store_wav(out)
```